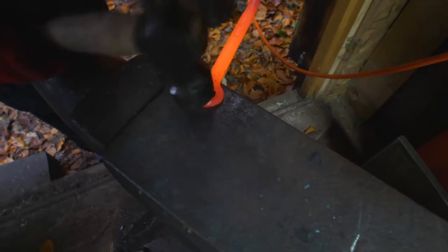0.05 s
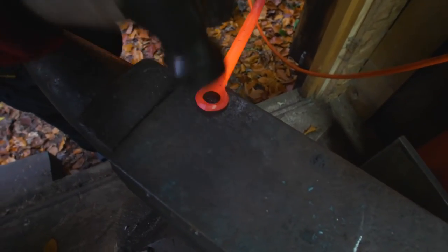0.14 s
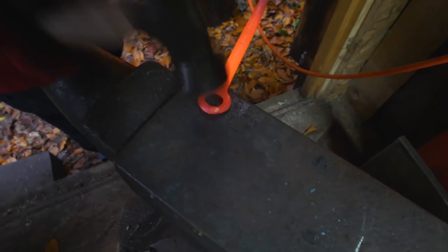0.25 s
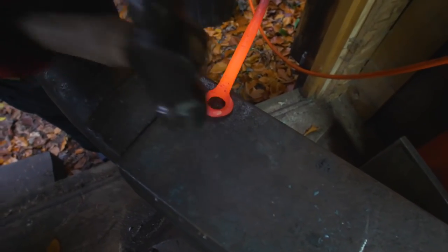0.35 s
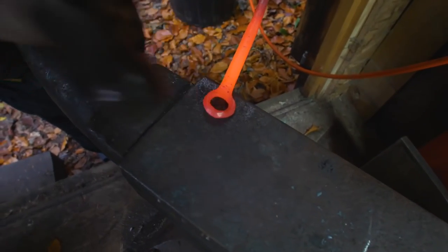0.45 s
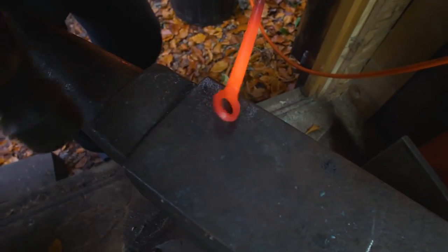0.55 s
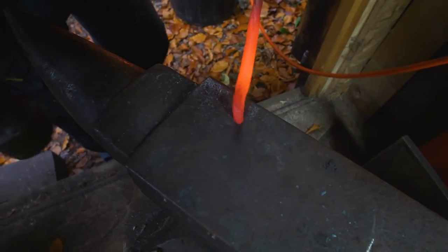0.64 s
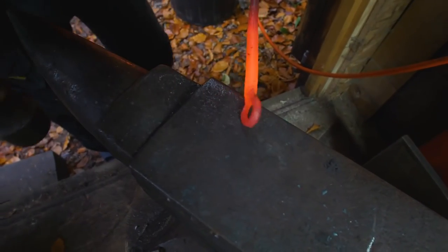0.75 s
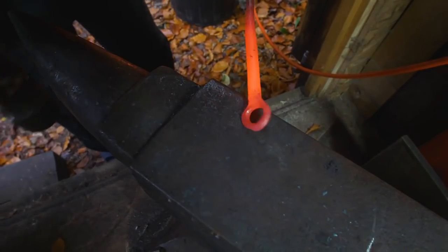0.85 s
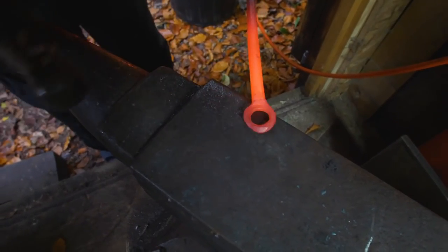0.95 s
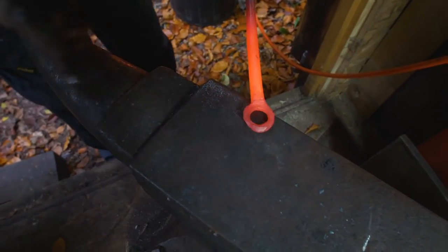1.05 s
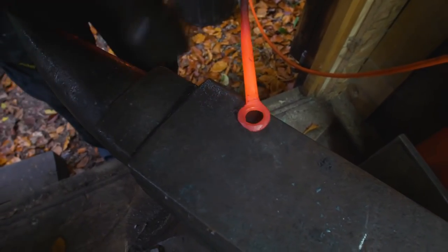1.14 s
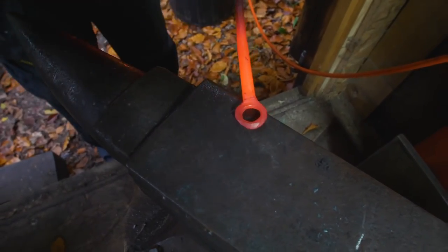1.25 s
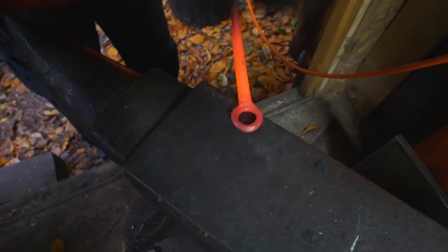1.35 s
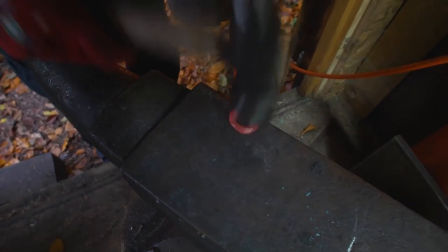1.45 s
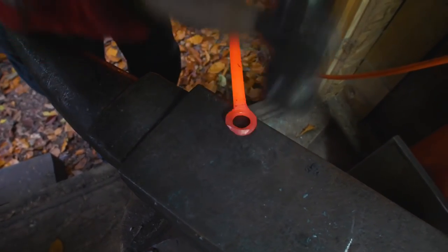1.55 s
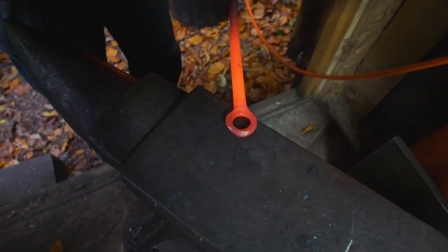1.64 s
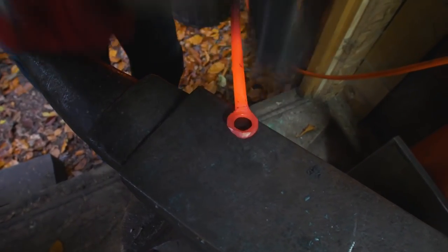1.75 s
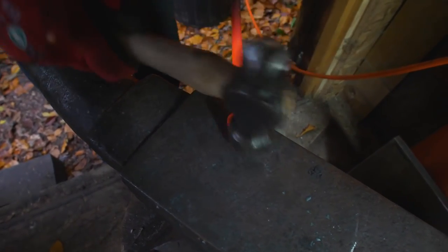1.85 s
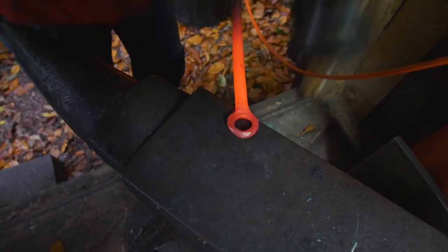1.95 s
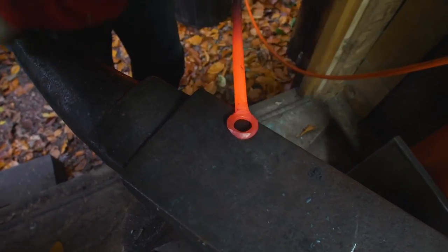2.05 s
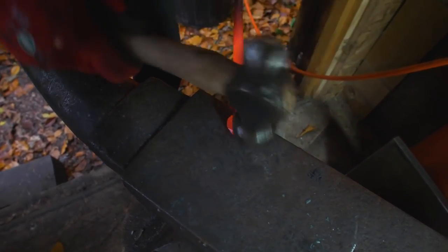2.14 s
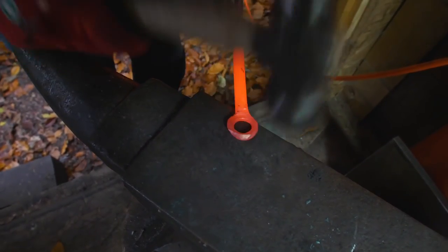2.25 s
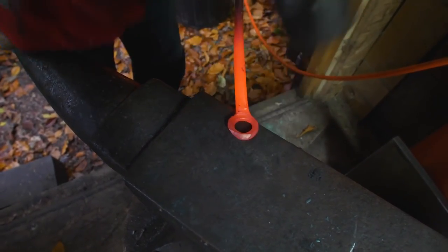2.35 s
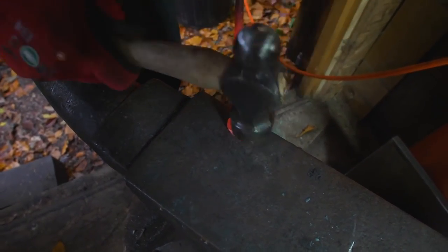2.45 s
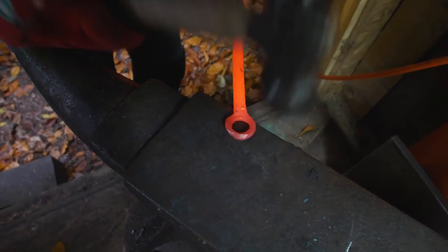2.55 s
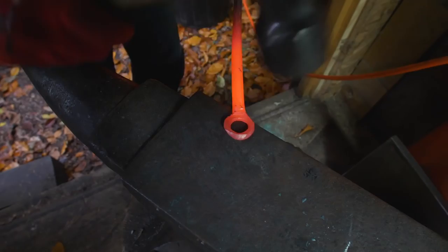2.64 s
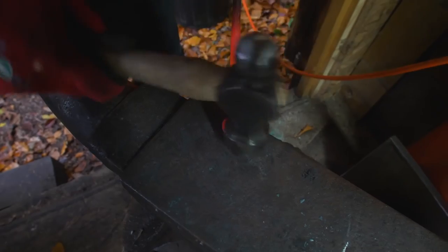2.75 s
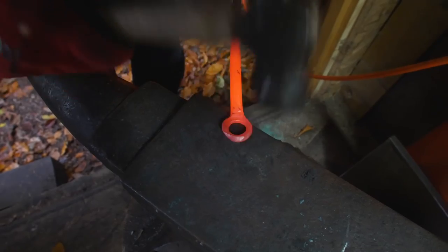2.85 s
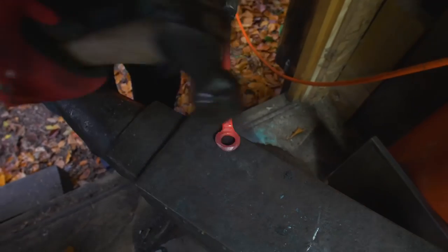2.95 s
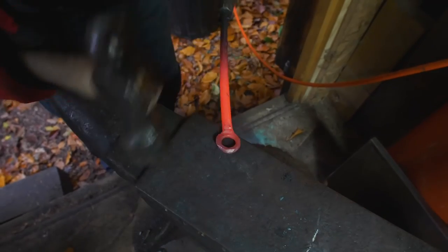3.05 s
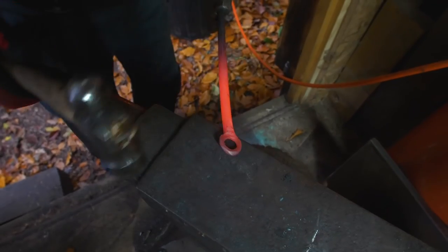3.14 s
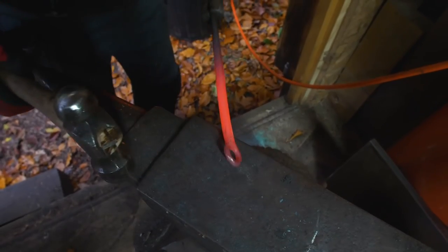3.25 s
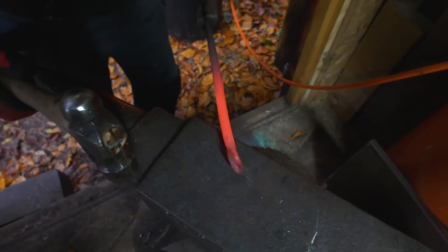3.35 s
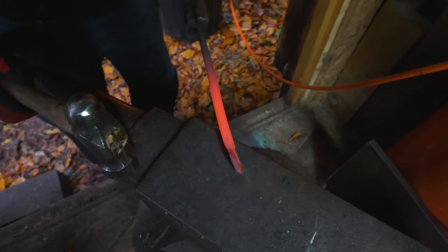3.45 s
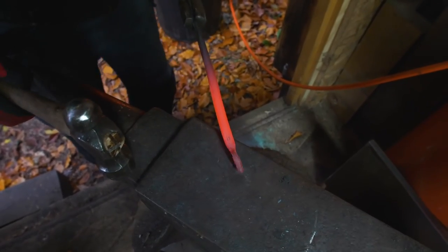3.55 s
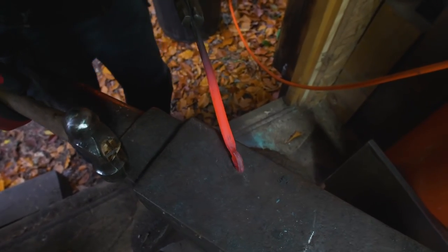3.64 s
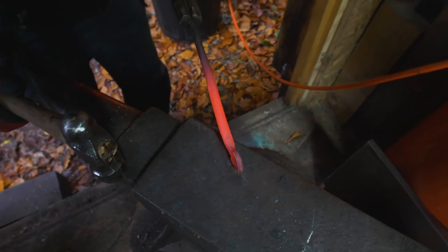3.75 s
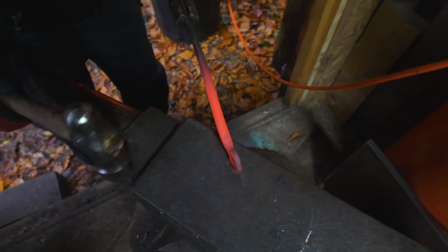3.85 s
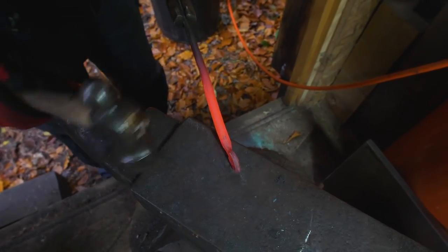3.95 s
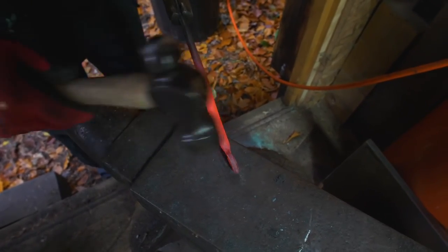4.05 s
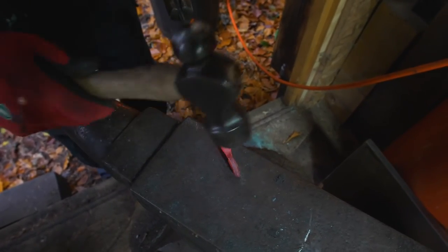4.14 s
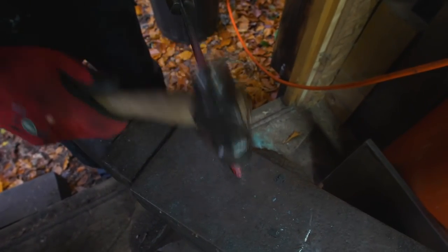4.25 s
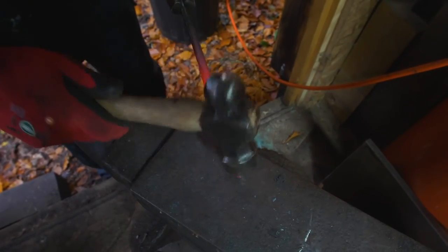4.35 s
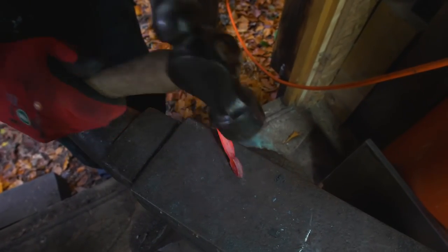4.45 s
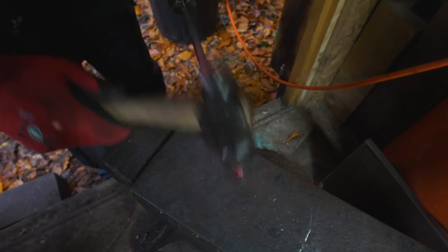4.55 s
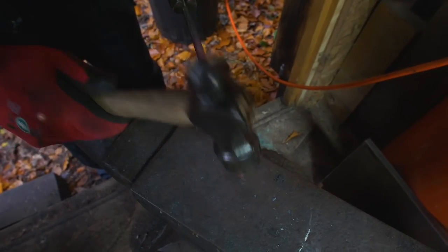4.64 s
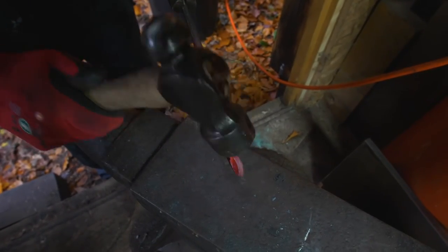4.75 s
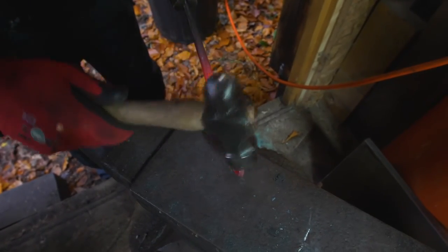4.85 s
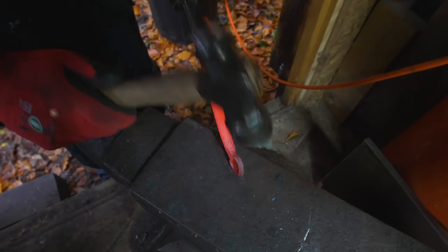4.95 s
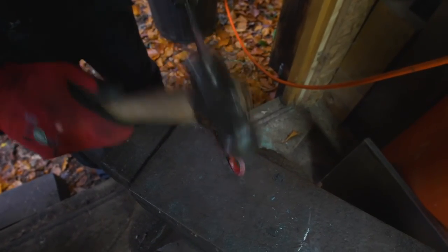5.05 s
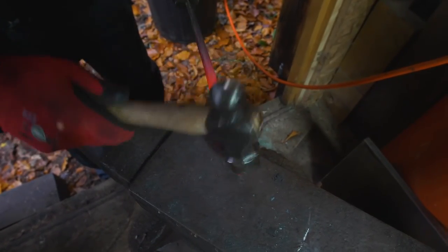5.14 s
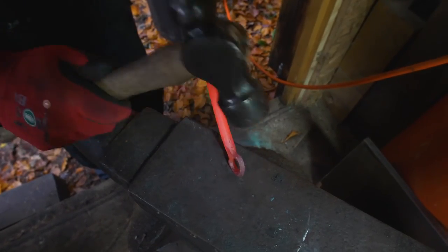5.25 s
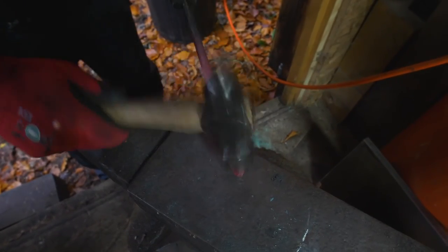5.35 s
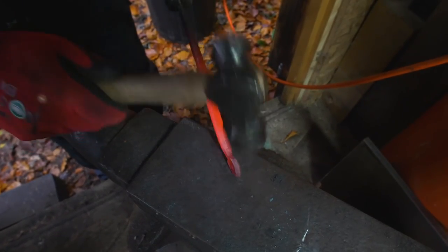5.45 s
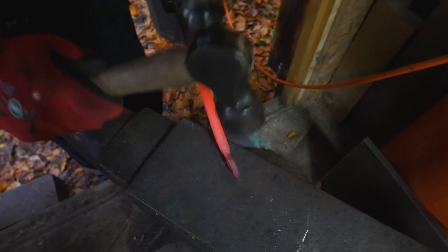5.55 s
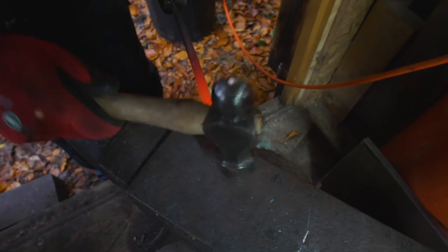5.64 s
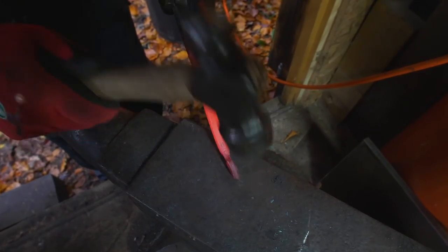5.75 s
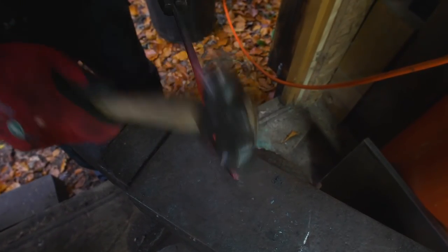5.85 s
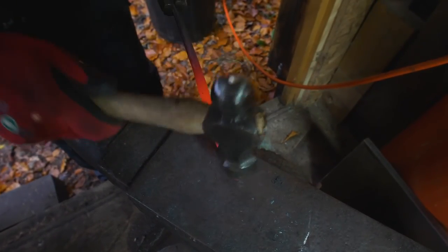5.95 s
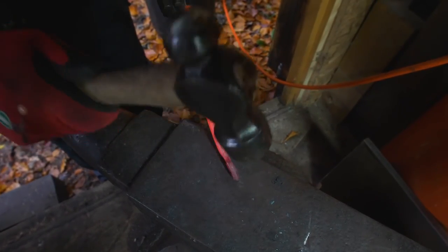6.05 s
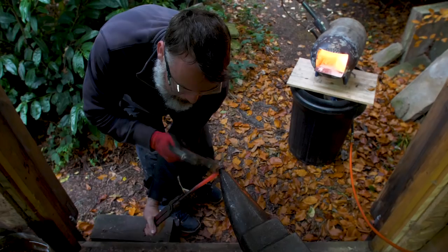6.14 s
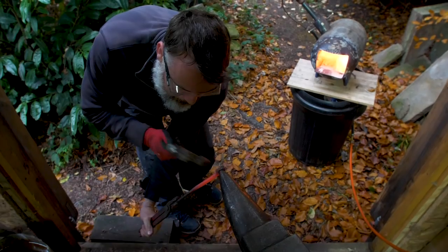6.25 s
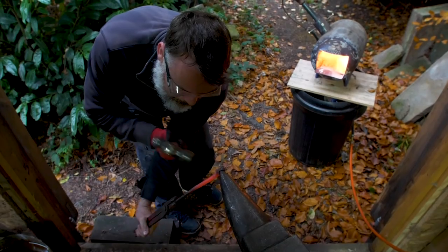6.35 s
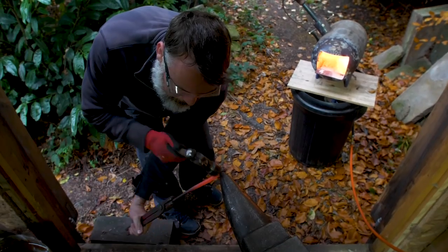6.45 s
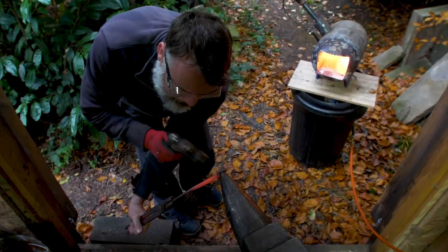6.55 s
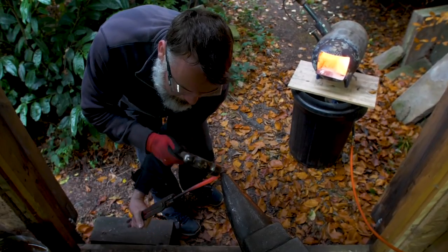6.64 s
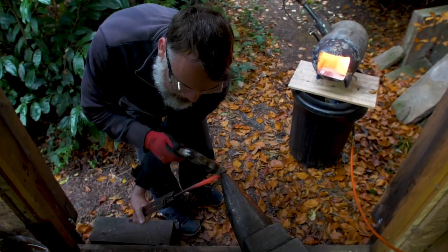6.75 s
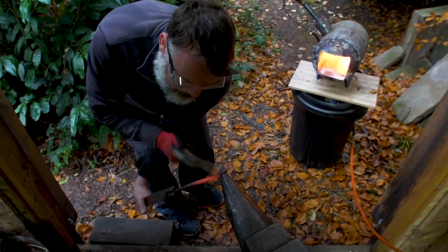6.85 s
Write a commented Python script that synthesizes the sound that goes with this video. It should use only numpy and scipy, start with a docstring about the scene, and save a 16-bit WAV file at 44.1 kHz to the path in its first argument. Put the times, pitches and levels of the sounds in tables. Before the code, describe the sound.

Seventeen crisp hammer blows on soft hot steel over an anvil, short faint ringing, light scrapes and tong ticks, low fluttering forge roar.

```python
"""Blacksmith at the anvil

A smith forges a hot steel eye outdoors: seventeen hammer blows, the last three heard from farther away.
Each blow adds short fading tones and bursts of noise: a smack, a clank and a thud of the stand.
Anvil and hammer ring on thinly, and the surroundings answer with a short tail of noise.
The tongs tick and squeak, the work scrapes and knocks on the anvil,
and a gas forge roars and hisses nearby as filtered noise."""
import sys
import numpy as np
from scipy import signal
from scipy.fft import rfft, irfft, next_fast_len
from scipy.io import wavfile
from scipy.ndimage import map_coordinates

SR = 44100
rng = np.random.default_rng(int(sys.argv[2]) if len(sys.argv) > 2 else 0)


def to_wav(s):
    """Save 16-bit WAV."""
    ch = np.atleast_2d(s).T  # columns
    pcm = np.round(np.clip(ch, -1, 1) * 32767)  # PCM
    wavfile.write(sys.argv[1], SR, pcm.astype(np.int16))


N = 303849

AGE = np.arange(SR) / SR  # seconds since a hit, one second long
TIME = np.arange(N) / SR  # seconds since the start of the scene

# ringing tones of the anvil: pitch_hz, level_db, fade_60db_s
ANVIL_MODES = [(1050, -17, .27), (1857, -4, .17), (3289, -3, .26), (3983, 0, .55)]
# ringing tones of the tongs: pitch_hz, level_db, fade_60db_s
TONGS_MODES = [(3145, -2, 0.054), (3900, -3.5, .02), (6560, -13, 0.03), (9040, -14, 0.037),
               (9200, -25.5, .03), (11600, -19.5, 0.044)]
# colour of the scraping of scale, the crust on hot steel: pitch_hz, level_db (per Hz)
SCALE_COLOUR = [(1500, -28), (3000, -2.5), (8000, -13), (15500, -16)]


def hammering():
    """Each blow leaves anvil and hammer ringing, and the surroundings answer."""
    # hammer blows: start_s, force_db, firmness_db (how firmly the work sits on the anvil), anvil_ring_db
    blows = [(0.103, 2, 3, -39), (0.332, -.5, 4.5, -43), (1.5228, 1, -5.5, -58.5), (1.8588, 0, -1, -66.5),
             (2.1882, 2.5, -4, -65), (2.498, -1.5, 0, -54.5), (2.786, -0.5, -4, -73),
             (4.3564, -4, -0.5, -65.5), (4.624, -1, 8.5, -57), (4.8852, -1, 7, -63), (5.1556, 2.5, 3, -74),
             (5.4195, 0, 2, -73.5), (5.6827, 0, -9, -67.5), (5.9514, -.5, -17, -73), (6.222, -3, -4, -74),
             (6.4762, .5, -2, -68.5), (6.7217, 1.5, 1.5, -67)]
    # an average blow with the eye flat, on edge, and heard from afar: levels of the parts in dB,
    # and clink_follows, how far the clink follows the firmness (dB per dB)
    on_flat = dict(thud_db=-28, smack_db=-30, clank_db=-24, clink_db=-31.5, crack_db=-35.5, hammer_db=-52.5, wet_db=-12, clink_follows=.08)
    on_edge = dict(thud_db=-30, smack_db=-26.5, clank_db=-48, clink_db=-41, crack_db=-35, hammer_db=-57, wet_db=-10.5, clink_follows=0.55)
    far_off = dict(thud_db=-34.5, smack_db=-37.5, clank_db=-40.5, clink_db=-33.5, crack_db=-33, hammer_db=-66, wet_db=-6.5, clink_follows=0.39)
    edge_from_s, distant_from_s = 4, 6.1
    hammer_per_force = 3.9  # dB per dB: a harder blow is above all a brighter one
    tail_per_ring, usual_ring_db = 0.16, -63  # dB per dB: waking the anvil fills the surroundings more
    lift_s = 0.016  # the anvil rings freely once the hammer has lifted off

    out = np.zeros(N)
    add(out, 0, amp(-50) * ring(ANVIL_MODES[-1:]))  # the anvil is already ringing at the start
    for start_s, force_db, firm_db, anvil_db in blows:
        edge = start_s > edge_from_s
        distant = start_s > distant_from_s
        levels = far_off if distant else on_edge if edge else on_flat
        hit = blow(levels, force_db, firm_db)
        stretch = 1
        if distant:
            hit = from_afar(hit)
            stretch = 1.35
        anvil = amp(anvil_db) * burst(ring(ANVIL_MODES, scatter_db=1.5)) * swell(lift_s)
        hammer = amp(levels["hammer_db"] + hammer_per_force * force_db) * burst(hammer_head(edge))
        wet_db = levels["wet_db"] + tail_per_ring * (anvil_db - usual_ring_db)
        tail = amp(wet_db) * surroundings(hit + amp(-3.5) * hammer, stretch)
        add(out, start_s, hit + anvil + hammer + tail)
    return out


def blow(levels, force_db, firm_db):
    """The dry impact on soft steel: force feeds smack and crack, a firm seat feeds clank and clink."""
    thud_per_force, smack_per_force = 0.2, 0.6  # dB per dB
    clink_db = levels["clink_db"] + levels["clink_follows"] * firm_db
    out = amp(levels["thud_db"] + thud_per_force * force_db) * burst(thud())
    out += amp(levels["smack_db"] + smack_per_force * force_db) * burst(smack())
    out += amp(levels["clank_db"] + firm_db) * burst(clank())
    out += amp(clink_db) * burst(clink())
    out += amp(levels["crack_db"] + force_db) * burst(crack())
    # the work lies slightly hollow and slaps the anvil face a moment after it is hit
    gap_s = rng.uniform(0.0006, 0.002)
    add(out, gap_s, amp(clink_db) * burst(slap()))
    return out


def thud():
    """The heavy stand gets moving a little late and sounds low, quickly fading tones."""
    # tones of the stand: pitch_hz, level_db, fade_60db_s
    stand_modes = [(174, -5, 0.12), (337, -2.5, 0.053), (405.2, 10, 0.059), (483, -5.5, 0.12),
                   (604.3, -15, 0.069)]
    return ring(stand_modes, scatter_db=1.2) * swell(0.0032)


def smack():
    """The hammer head stops within a millisecond and pushes out a short swing of air."""
    # tones of the pushed air: pitch_hz, level_db, fade_60db_s
    air_modes = [(657, 6, 0.0068), (900, 0, .006), (1180, -4.5, 0.0054)]
    return low_cut(ring(air_modes, scatter_db=1, detune=0.03), hz=216)


def clank():
    """Pressed together, hammer and work sound damped tones whose pitches vary with the contact."""
    # tones under contact: pitch_hz, level_db, fade_60db_s
    pressed_modes = [(1140, 0.23, 0.0055), (1613, 2.24, 0.0064), (1896, -3.5, 0.013), (2095, -1.5, 0.012)]
    return ring(pressed_modes, scatter_db=1.5, detune=0.04, alternate=True)


def clink():
    """Released from the pressure, the tones are mostly higher and last longer."""
    # tones after release: pitch_hz, level_db, fade_60db_s
    released_modes = [(1770, -11.5, .11), (1791, -10.5, 0.06), (2020, -16.5, 0.087), (2440, -7.5, .012),
                      (3222, 0, 0.027), (3470, -7.5, 0.071), (3630, -2, 0.032), (3874, -5, 0.031),
                      (4480, -10, 0.021), (4670, -11, .04)]
    return ring(released_modes, scatter_db=2, detune=0.012, alternate=True)


def crack():
    """Brittle scale shatters under the face: noise with a fast and a slower fade."""
    # colour of the shattering: pitch_hz, level_db (per Hz)
    crack_colour = [(60, -22), (300, 0), (1200, 5.5), (2100, 0), (2650, -7), (3300, 5.5), (4000, 2.5),
                    (5200, -3), (7200, -0.5), (10000, -5.5), (15000, -8.5), (17000, -16)]
    shatter = rng.standard_normal(SR) * (fade(0.003) + amp(-4) * fade(0.049))
    return colour(shatter, crack_colour)


def slap():
    """The work slaps the anvil face: a very short burst of noise."""
    # colour of the slap: pitch_hz, level_db (per Hz)
    slap_colour = [(200, -12.5), (700, -1.5), (1100, -1), (2300, -5.5), (2700, -3.5), (3600, -0.5),
                   (5200, -13.5), (8000, -14.5), (15000, -26)]
    return colour(rng.standard_normal(SR) * fade(0.0074), slap_colour)


def hammer_head(edge):
    """The small hard head rings very high, with a balance that depends on how the work is held."""
    # tones of the head: pitch_hz, flat_db (work lying flat), edge_db (work on edge), fade_60db_s
    head_modes = [(7844, -12, -10, .13), (8560, -11, -8, .15), (10873, -7, -16, .16),
                  (12974, -17, -16, .15), (14007, 0, -13, .15), (14653, -3, -5, .165), (15031, -4, 0, .145),
                  (15737, -13, -15, .16)]
    chosen = []
    for hz, flat_db, edge_db, t60 in head_modes:
        chosen.append((hz, edge_db if edge else flat_db, t60))
    return ring(chosen, scatter_db=3.5, alternate=True)


def from_afar(hit):
    """At a distance dense reflections smear the impact, and the whole anvil and its stand are heard."""
    # tones that carry far: pitch_hz, level_db, fade_60db_s
    distant_modes = [(85.3, -45.5, 0.35), (168, -30.5, 0.17), (410, -16, 0.029), (444, -26.5, 0.093),
                     (1539, -32.5, 0.11), (1746, -23, 0.075), (3479, -11, 0.016)]
    # colour of the impact far from the anvil: pitch_hz, level_db
    afar_colour = [(100, -10), (350, -4), (600, -6), (1200, -2.5), (2500, -1.5), (4000, -2), (8000, -7),
                   (15000, -7)]
    scatter = rng.standard_normal(SR) * fade(0.031)
    smeared = signal.fftconvolve(hit, scatter / np.linalg.norm(scatter))[:SR]
    body = ring(distant_modes, scatter_db=1, detune=0.004) * swell(0.0037)
    return body + colour(amp(-0.5) * hit + amp(-2.5) * smeared, afar_colour)


def surroundings(x, stretch):
    """Shed wall, posts and ground scatter a short tail of unit energy; stretch lengthens it."""
    # colour of the scattered sound: pitch_hz, level_db
    scattered_colour = [(100, -6.5), (400, -3), (700, -7), (1300, -11), (2000, -3.5), (2600, -3),
                        (3400, -3), (4500, 1.5), (6000, -5.5), (15000, -15)]
    # fading times before stretching: pitch_hz, fade_60db_s
    decay_times = [(150, 0.37), (500, 0.2), (2000, 0.16), (4000, 0.14), (8000, 0.18), (15000, 0.12)]
    # noise split into pitch bands, so that each band can fade at its own pace
    hz, t, bands = signal.stft(rng.standard_normal(SR // 2), SR, nperseg=256)
    dying = amp(-60 * t / (stretch * along(decay_times, hz)[:, None]))
    tail = signal.istft(bands * dying, SR, nperseg=256)[1]
    tail *= swell(0.0011)[:len(tail)]
    return signal.fftconvolve(colour(x, scattered_colour), tail / np.linalg.norm(tail))[:SR]


def touches():
    """The work knocks lightly on the anvil: a dull burst of noise and a faint ring."""
    # light knocks: start_s, knock_db, anvil_ring_db
    knocks = [(2.436, -55, -84.5), (3.014, -76.5, -79), (5.27, -71, -83)]
    knock_colour = [(300, 0), (1000, 17), (1800, -1), (3000, -6), (12000, -35)]  # pitch_hz, level_db
    out = np.zeros(N)
    for start_s, knock_db, ring_db in knocks:
        knock = colour(rng.standard_normal(SR) * fade(0.013), knock_colour)
        add(out, start_s, amp(knock_db) * burst(knock) + amp(ring_db) * burst(ring(ANVIL_MODES)))
    return out


def tongs_ticks():
    """The tongs touch the work: their jaws ring briefly under a scratchy click."""
    # ticks: start_s, peak_db
    ticks = [(3.015, -58), (3.808, -61), (4.024, -60), (4.061, -57), (4.087, -58.5), (4.126, -57),
             (4.168, -62)]
    out = np.zeros(N)
    for start_s, peak_db in ticks:
        jaws = ring(TONGS_MODES, scatter_db=2, detune=0.015)
        click = colour(rng.standard_normal(SR) * fade(0.0063), SCALE_COLOUR)
        tick = jaws + amp(13.5) * click
        add(out, start_s, amp(peak_db) * tick / np.abs(tick).max())
    return out


def tongs_squeaks():
    """The work turns in the tongs, and the rubbing keeps their tones sounding."""
    # squeaks: start_s, length_s, level_db
    squeaks = [(3.28, 0.12, -72.5)]
    rubbed = signal.fftconvolve(rng.standard_normal(N), ring(TONGS_MODES))[:N]
    return strokes(squeaks) * unit(rubbed)


def scraping():
    """The steel is dragged over the anvil face: noise of uneven strength."""
    # drags: start_s, length_s, level_db (before the unevenness)
    drags = [(.44, .07, -72), (.525, 0.094, -69.5), (.81, 0.14, -66), (.9, 0.69, -76)]
    return strokes(drags) * amp(2.7 * wobble(72.4)) * noise(SCALE_COLOUR)


def forge_roar():
    """The flame roars in the forge's hollow and flutters."""
    # colour of the roar: pitch_hz, level_db (per Hz)
    roar_colour = [(25, -32.5), (60, -17), (100, -12), (150, -3.5), (195, -7.5), (255, 2.5), (315, -1),
                   (385, -15), (480, -15), (740, -25), (1000, -32), (1500, -40.5), (2500, -47),
                   (5000, -73.5)]
    # loudness before the flutter: time_s, level_db
    roar_level = [(0, -46.5), (1.36, -44), (1.85, -50.5), (2.7, -50.5), (3.2, -55.5), (3.7, -54),
                  (4.2, -49), (5, -52.5), (6.89, -50.5)]
    return amp(curve(roar_level) + 1.4 * wobble(7)) * noise(roar_colour)


def forge_hiss():
    """The gas jet hisses with a slight flutter."""
    # colour of the hiss: pitch_hz, level_db (per Hz)
    hiss_colour = [(500, -8), (1300, 2.5), (2000, 3.5), (2600, -2), (3900, 4), (4600, -3), (5300, -10.5),
                   (6400, -7.5), (9000, -24.5), (11300, -17.5), (13000, -21), (16000, -34.5)]
    # loudness before the flutter: time_s, level_db
    hiss_level = [(.3, -72.5), (.62, -65), (1.2, -66), (1.7, -76.5), (2.1, -70.5), (2.7, -74),
                  (3.55, -84.5), (4.75, -79.5), (6.15, -80.5), (6.25, -71.5), (6.89, -73.5)]
    return amp(curve(hiss_level) + 0.47 * wobble(9)) * noise(hiss_colour)


def ring(modes, scatter_db=0, detune=0, alternate=False):
    """Fading tones; strength and pitch vary with the spot struck, neighbours may swing oppositely."""
    out = np.zeros(SR)
    for k, (hz, db, t60) in enumerate(modes):
        size, shift = rng.standard_normal(2)
        direction = (-1) ** k if alternate else 1
        tone = np.sin(2 * np.pi * hz * (1 + detune * shift) * AGE)
        out += direction * amp(db + scatter_db * size) * fade(t60) * tone
    return out


def fade(t60):
    """An envelope that falls 60 dB in t60 seconds."""
    return amp(-60 * AGE / t60)


def swell(rise):
    """A heavy body takes about rise seconds to get moving."""
    return 1 - np.exp(-AGE / rise)


def strokes(rows):
    """Loudness of rubbing strokes: each speeds up, holds and slows to rest."""
    rise, fall = 0.15, 0.28  # shares of a stroke spent speeding up and slowing down
    out = np.zeros(N)
    for start_s, length_s, db in rows:
        done = (TIME - start_s) / length_s
        out += amp(db) * np.clip(np.minimum(done / rise, (1 - done) / fall), 0, 1)
    return out


def wobble(rate):
    """A smooth random curve with rate random points a second."""
    return map_coordinates(rng.standard_normal(N // 100), [TIME * rate], mode="wrap")


def noise(spectrum):
    """Coloured noise of average strength (rms) 1."""
    m = next_fast_len(N)
    gain = amp(along(spectrum, np.fft.rfftfreq(m, 1 / SR)))
    return unit(irfft(rfft(rng.standard_normal(m)) * gain, m)[:N])


def colour(x, spectrum, size=2048):
    """Filter that never sounds ahead of its input, so that attacks stay sharp."""
    # folding the cepstrum gives the minimum-phase filter
    cepstrum = irfft(np.log(amp(along(spectrum, np.fft.rfftfreq(size, 1 / SR)))))
    cepstrum[1:size // 2] *= 2
    cepstrum[size // 2 + 1:] = 0
    return signal.fftconvolve(x, irfft(np.exp(rfft(cepstrum))))[:len(x)]


def low_cut(x, hz):
    """A gentle bass roll-off below hz."""
    return signal.sosfilt(signal.butter(2, hz, "highpass", fs=SR, output="sos"), x)


def along(points, hz):
    """Read (pitch_hz, value) points on a log pitch axis."""
    f, v = np.transpose(points)
    return np.interp(np.log(hz + 1), np.log(f + 1), v)


def curve(rows):
    """Join (time_s, value) points by straight lines, one value per sample."""
    s, value = np.transpose(rows)
    return np.interp(TIME, s, value)


def add(track, start_s, sound):
    """Mix a sound into the track at start_s."""
    part = track[round(start_s * SR):][:len(sound)]
    part += sound[:len(part)]


def amp(db):
    """Turn decibels into a plain factor."""
    return 10 ** (np.asarray(db) / 20)


def unit(x):
    """Scale to rms 1."""
    return x / np.sqrt(np.mean(x ** 2) + 1e-20)


def burst(x):
    """Scale a hit to rms 1 over its first fiftieth of a second."""
    return x / np.sqrt(np.mean(x[:SR // 50] ** 2) + 1e-20)


def scene():
    """Hammering, handling of the work, and the forge, on one channel."""
    handling = touches() + tongs_ticks() + tongs_squeaks() + scraping()
    return (hammering() + handling + forge_roar() + forge_hiss())[None]


def record(dry):
    """Loud peaks are rounded off below a ceiling; deep bass and the highest treble are cut."""
    # ceiling at which loud peaks are rounded off, lower after 1.5 s: time_s, level_db
    ceiling = [(1.2, -5.4), (1.5, -10.7)]
    top = amp(curve(ceiling))
    rounded = dry / (1 + (dry / top) ** 8) ** (1 / 8)
    top_hz = 16300
    band = signal.ellip(10, 0.3, 80, top_hz, fs=SR, output="sos")
    return signal.sosfilt(band, low_cut(rounded, hz=34.6))


dry = scene()
out = record(dry)
to_wav(out)
```